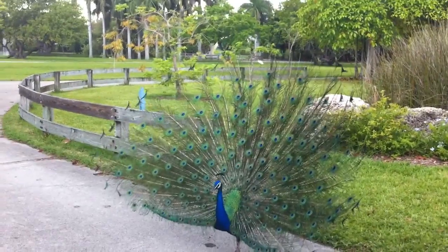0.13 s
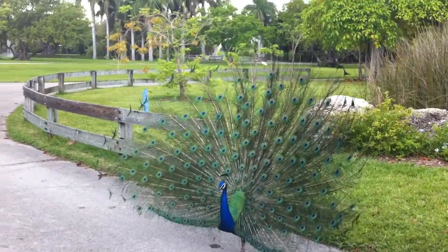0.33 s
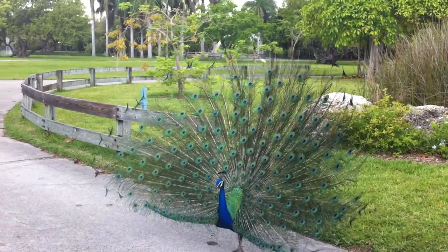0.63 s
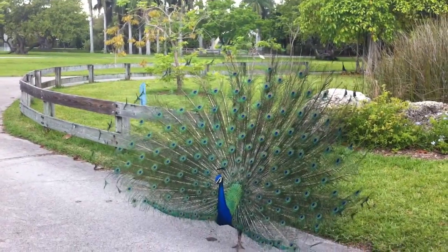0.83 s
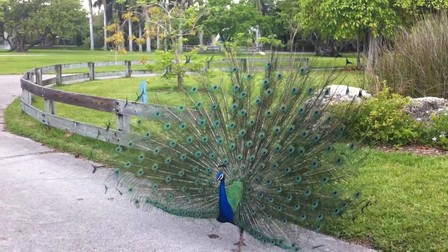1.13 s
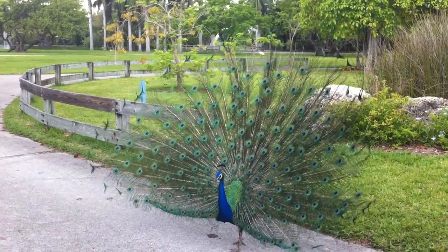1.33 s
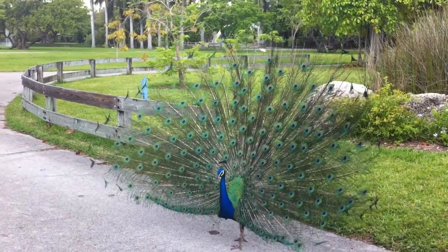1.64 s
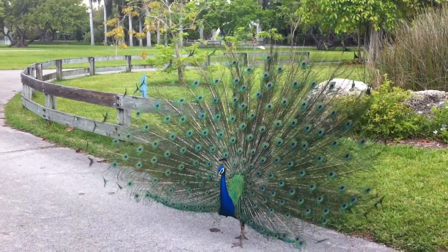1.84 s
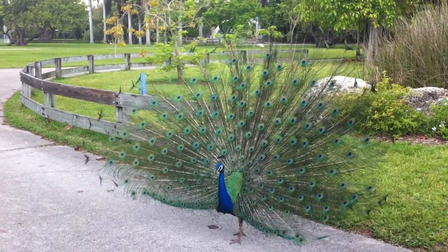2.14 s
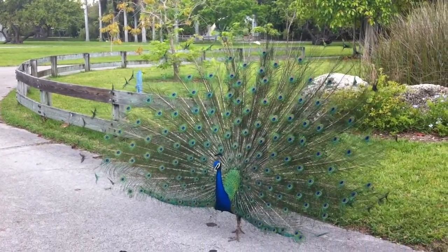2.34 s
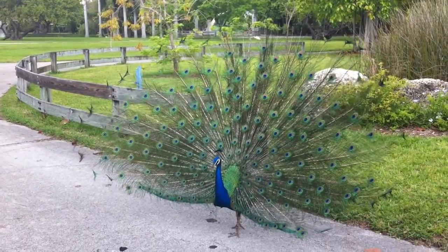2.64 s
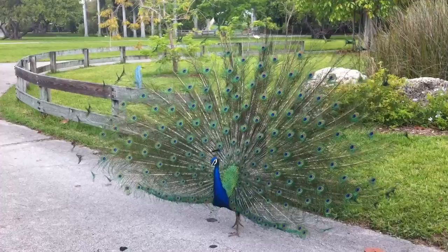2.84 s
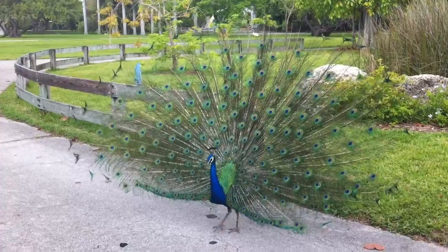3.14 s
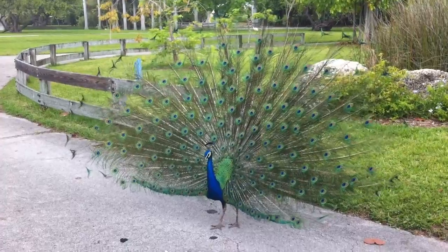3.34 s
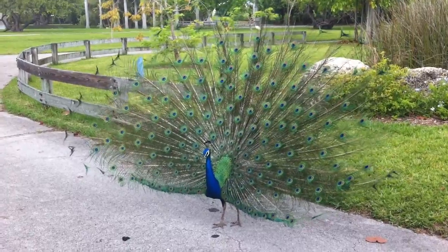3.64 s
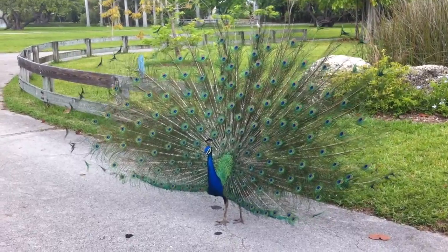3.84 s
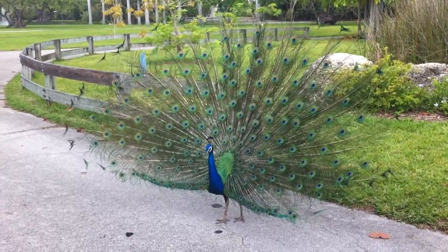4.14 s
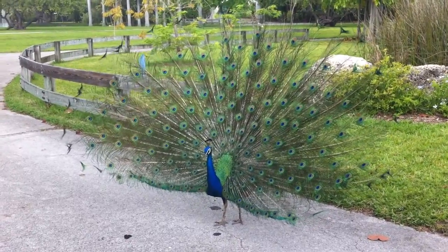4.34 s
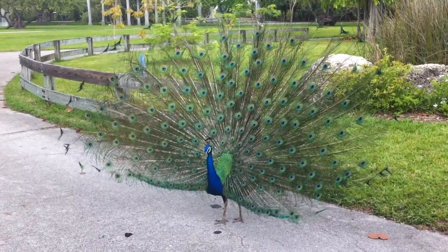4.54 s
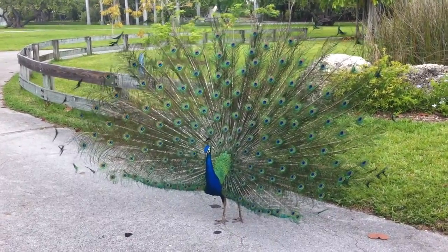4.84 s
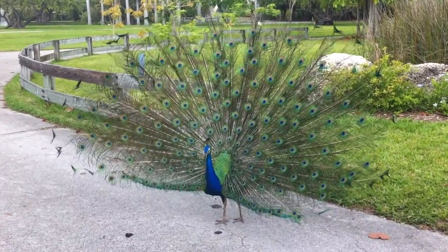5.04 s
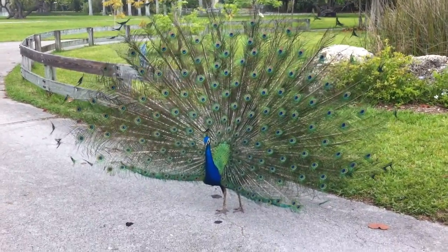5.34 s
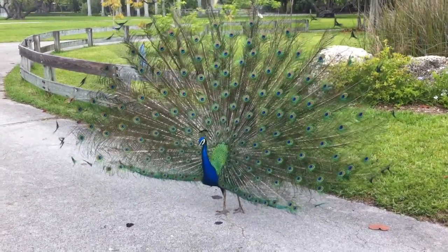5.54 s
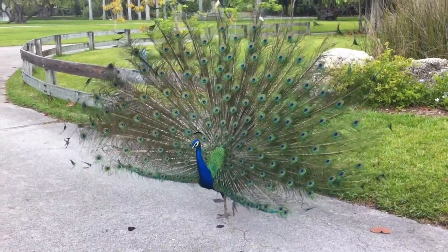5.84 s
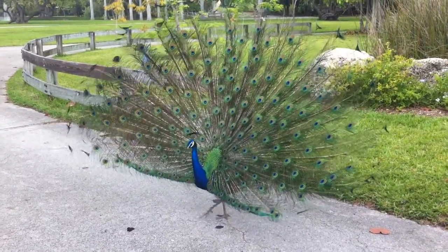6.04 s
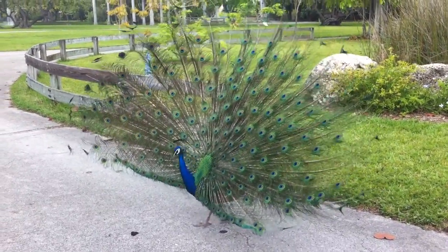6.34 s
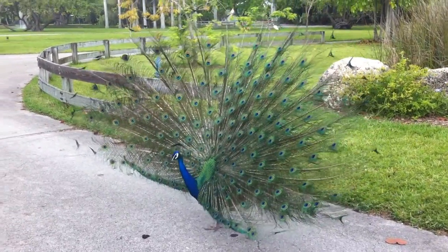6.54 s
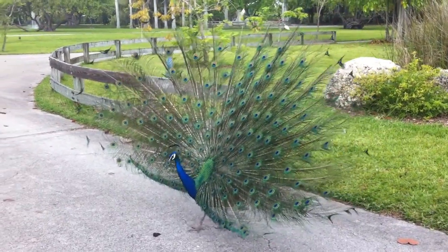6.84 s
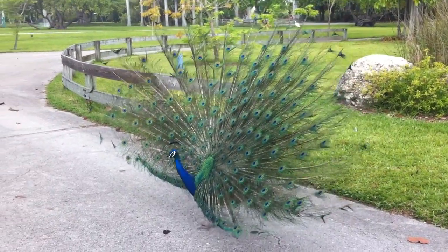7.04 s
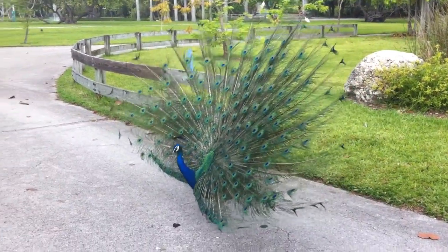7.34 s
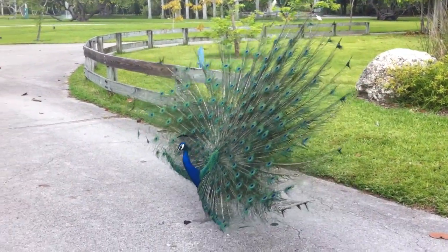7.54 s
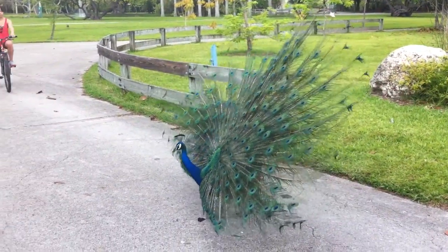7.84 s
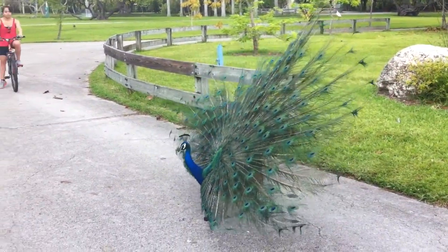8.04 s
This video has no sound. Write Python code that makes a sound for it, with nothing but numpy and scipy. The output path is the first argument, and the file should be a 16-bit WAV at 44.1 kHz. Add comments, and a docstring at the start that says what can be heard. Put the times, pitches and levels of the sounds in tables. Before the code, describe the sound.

Two piercing, nasal peacock cries in the first second ring off distant trees, leaving soft traffic-and-leaf hush, tiny clicks and faint feather rustles.

```python
"""A park path: a displaying peacock a few metres from the microphone wails twice; lawn, fence, trees answer.
Each wail is an arch of pitch, a sum of harmonics through throat resonances: hoarse on the way up and
down, clean and brassy at the top. Between and after the wails come short ticks, knocks and chirps (a snap
with one ringing resonance, some perhaps from quills), and the train rustles (swells of grainy noise).
Behind lie the hum of traffic and leaves (shaped noise), faint pips and soft lumps (short bands of noise)."""
import sys
import numpy as np
from scipy import signal
from scipy.fft import rfft, irfft
from scipy.io import wavfile
from scipy.ndimage import uniform_filter1d

SR = 44100
rng = np.random.default_rng(int(sys.argv[2]) if len(sys.argv) > 2 else 0)


def persist_wave(psi):
    """Save psi, clipped to +-1, as 16-bit WAV."""
    counts = np.round(np.clip(psi, -1, 1) * 32767).astype(np.int16)
    wavfile.write(sys.argv[1], SR, np.atleast_2d(counts).T)


N = 361646

# wails: (start [s], pitch starts to sag [s], end [s], top pitch [Hz], effort [dB])
WAILS = [(-.195, 0.12, .289, 682, 2.6), (0.602, .933, 1.136, 681.9, 1.9)]
# resonances of the voice as it arrives over the path:
# (frequency [Hz], width between -6 dB points [Hz], level [dB])
VOICE_RESONANCES = [(738, 200, -19), (1134, 130, -13.5), (1425, 64, -28.5), (1652, 290, -18),
                    (1971.4, 90, -15), (2270, 226, -12.5), (2544, 110, -8), (2700, 134.0, -14.5),
                    (3013, 140, -20.5), (3398, 230, -22), (3667, 47, -25.0), (4036.6, 170, -27),
                    (4390, 390, -24), (5300, 340, -24.5), (5960, 1100, -36.5), (7208, 650, -30),
                    (7930, 300, -27.5), (8740, 350, -25.5), (9560, 400, -29), (10480, 740, -28.5),
                    (11490, 320, -27.5), (12220, 180, -28.5), (12930, 490, -30.5), (13700, 2783.0, -34),
                    (15650, 500, -35)]
# dead spots where the direct sound and its bounce cancel: (frequency [Hz], width [Hz], depth [dB])
DEAD_SPOTS = [(1500, 98, -10), (3320, 80, -6), (4770, 130, -9), (6300, 290, -15.5)]
# ring of the park's far answer: (frequency [Hz], time to fall 60 dB [s])
PARK_T60 = [(500, 0.5), (2000, 0.97), (3000, 0.8352), (5000, 0.72), (9000, 0.5738), (15000, 0.544)]
# colour of the park's whole answer: (frequency [Hz], level [dB])
PARK_COLOUR = [(650, -25.5), (1200, -24), (1500, -28.5), (1950, -21.5), (2015, -18), (2042, -4.5),
               (2080, -15), (2300, -15.5), (2700, -20), (3100, -21), (3600, -25), (6000, -29.5),
               (9000, -23.5), (16000, -34)]
# spectrum of the outdoor background, before overall levelling: (frequency [Hz], relative density [dB per Hz])
AIR_SPECTRUM = [(25, -44), (48, -23), (97, -6), (153, 1), (290, -9), (800, -9.5), (1200, -7), (1480, -11),
                (1890, -7.5), (2700, -15), (3300, -15.5), (4400, -21), (9000, -26), (15500, -31.5)]
# short ticks, knocks and chirps, each a snap with one ringing resonance:
# (time [s], peak level [dB], ring [Hz], ring before doubling, against the snap [dB])
TICKS = [(0.407, -42.5, 7100, 7.5), (2.0888, -40.5, 950, 10), (2.258, -31.5, 2500, -8),
         (4.721, -46, 6720, 14), (5.006, -42.5, 1310, 16), (5.071, -34.5, 2700, -3.5),
         (5.7032, -37, 2500, -3), (6.407, -37.5, 2380, -10.5), (7.822, -43.5, 2160, 23)]
# colour of the snap: (frequency [Hz], level [dB])
TICK_COLOUR = [(200, -8), (1000, -4), (4500, -2.5), (8000, -4.5), (12000, -13), (16000, -10.5)]
# faint short pips from far off: (middle [s], frequency [Hz], level before the swell [dB])
PIPS = [(2.365, 1796, -61), (2.447, 645, -58.5), (5.163, 1753, -57), (5.627, 747, -55)]
# rustles of the train: (middle [s], length [s], level before the swell [dB])
RUSTLES = [(3.781, 0.124, -60), (4.349, 0.04, -56.5), (4.854, 0.1, -59.5), (7.057, 0.042, -51),
           (7.713, 0.04, -51.5)]
# colour of the rustles: (frequency [Hz], level [dB])
RUSTLE_COLOUR = [(500, -30), (1500, 3), (2300, 3), (3300, -2), (4500, -11.5), (7000, -11), (10000, -26),
                 (16000, -31)]

LEAD_S = .25  # room ahead of time zero for a wail already under way
# pitch scoops up fast, creeps to its top, sags, and drops as the air runs out
SCOOP_S, SCOOP_HZ_PER_S, SCOOP_BEND_S = .1, 1240, .012
CREEP_S, CREEP_HZ_PER_S = .235, 100
SAG_HZ_PER_S, SAG_BEND_S = 580, .022
DROP_HZ, DROP_S = 62, .019
# the voice is at full strength above FULL_HZ and weakens below it
FULL_HZ, FULL_BEND_HZ, WEAK_DB_PER_HZ = 616, 6, .15
ATTACK_S, RELEASE_S = .006, .004
# effort builds during the scoop and runs out at the end: dB lacking at the very edge, time constant
SWELL_DB, SWELL_S, FADE_DB, FADE_S = -3, .09, -3, .012
# above CLEAN_HZ the voice locks into a clean, brassy note; just under it, it breaks and dulls
CLEAN_HZ, CLEAN_WIDTH_HZ = 668.7, 5.9
# lift of the upper harmonics; the hoarse one holds at mid-wail and sharpens with time
BRASSY_DB, HOARSE_DB, SHARPEN_DB_PER_S = 2.5, -11, 9.5
BREAK_HZ, BREAK_WIDTH_HZ, BREAK_DB = 630, 7.4, -5.5
ROUGH_CLEAN, ROUGH_HOARSE = .25, .85  # 0 pure to 1 fully rough
AIR_DB, AIR_DB_PER_S = -57.5, .21  # background level at time zero and its slow rise
EDGE_HZ = 15900  # upper band limit of the recorder


def gain_of(db):
    """Decibels to amplitude."""
    return 10 ** (np.asarray(db) / 20)


def evened(x):
    """Scales to rms 1."""
    return x / np.sqrt(np.mean(x ** 2) + 1e-20)


def read(points, hz):
    """Reads a table of values over frequency on a log-frequency axis."""
    f, value = np.transpose(points)
    return np.interp(np.log(hz + 1), np.log(f + 1), value)


def add(mix, s, sound):
    """Mixes a sound in at time s, or at the beginning if s is negative."""
    part = mix[max(round(s * SR), 0):][:len(sound)]
    part += sound[:len(part)]


def band_noise(size, hz, width_hz):
    """Noise of rms 1 in a bell-shaped band."""
    f = np.fft.rfftfreq(size, 1 / SR)
    bell = np.exp(-.5 * ((f - hz) / width_hz) ** 2)
    return evened(irfft(rfft(rng.standard_normal(size)) * bell, size))


def causal(gain):
    """Impulse response with this magnitude that starts at once and rings out (minimum phase)."""
    both_sides = np.r_[gain, gain[-2:0:-1]]
    log_gain = np.log(np.maximum(both_sides, 1e-5))
    return np.fft.ifft(np.exp(np.conj(signal.hilbert(log_gain)))).real


def knee(x, bend):
    """Zero below zero and x above it, with a rounded corner."""
    return bend * np.logaddexp(0, x / bend)


def wail(start, sag_at, end, top_hz, db):
    """One arch of pitch; strength, brightness and roughness follow from it."""
    t = np.arange(start, end, 1 / SR)
    age, left = t - start, end - t
    scoop = SCOOP_HZ_PER_S * knee(SCOOP_S - age, SCOOP_BEND_S)
    creep = CREEP_HZ_PER_S * knee(CREEP_S - age, SCOOP_BEND_S)
    sag = SAG_HZ_PER_S * knee(t - sag_at, SAG_BEND_S)
    drop = DROP_HZ * np.exp(-left / DROP_S)
    hz = top_hz - scoop - creep - sag - drop

    gate = np.minimum(age / ATTACK_S, 1) * np.minimum(left / RELEASE_S, 1)
    effort_db = db + SWELL_DB * np.exp(-age / SWELL_S) + FADE_DB * np.exp(-left / FADE_S)
    weak_db = WEAK_DB_PER_HZ * knee(FULL_HZ - hz, FULL_BEND_HZ)
    strength = gate * gain_of(effort_db - weak_db)

    clean = 1 / (1 + np.exp((CLEAN_HZ - hz) / CLEAN_WIDTH_HZ))
    hoarse_db = HOARSE_DB + SHARPEN_DB_PER_S * (age - age.mean())  # harsher on the way down than up
    break_db = BREAK_DB * np.exp(-((hz - BREAK_HZ) / BREAK_WIDTH_HZ) ** 2)
    bright_db = clean * BRASSY_DB + (1 - clean) * hoarse_db + break_db
    rough = clean * ROUGH_CLEAN + (1 - clean) * ROUGH_HOARSE
    return hz, strength, bright_db, rough


def syrinx(hz, strength, bright_db, rough, flutter=.003, flutter_hz=68, jitter=.0065, jitter_hz=80,
           bright_hz=5000, hiss_db=-12, waver_db=5, waver_hz=18, waver_above_hz=3000, count=31):
    """Pulses of the vibrating membranes: sharp and steadier at full pitch, fluttering and blunt below it."""
    size = len(hz)
    unrest = np.clip(rough, 0, 1) ** 2  # the vibration stays nearly pure until it is quite rough
    # flutter and jitter are shares of the pitch
    wobble = flutter * band_noise(size, flutter_hz, 24)
    wobble = wobble + jitter * band_noise(size, jitter_hz, jitter_hz / 2)
    turns = np.cumsum(hz * (1 + unrest * wobble)) / SR
    k = np.arange(1, count + 1)[:, None]  # harmonic numbers
    # a sharper closure lifts all the upper harmonics together
    lift_db = bright_db / (1 + (bright_hz / (k * hz)) ** 4)
    heights = gain_of(lift_db) * (k * hz < SR / 2)
    # in the hoarse voice each overtone swells and fades on its own
    waver = np.array([band_noise(size, 0, waver_hz) for _ in k])
    waver_share = 1 / (1 + (waver_above_hz / (k * hz)) ** 4)
    heights = heights * gain_of(waver_db * unrest * waver * waver_share)
    pulses = (heights * np.cos(2 * np.pi * k * turns)).sum(0)
    # high turbulent hiss escapes once in every cycle
    puffs = 1 + np.cos(2 * np.pi * turns)
    rasp = gain_of(hiss_db) * unrest * puffs * band_noise(size, 11500, 2800)
    return strength * (pulses + rasp)


def throat(size=4096):
    """Impulse response of the voice's steep resonances and its dead spots."""
    f = np.fft.rfftfreq(size, 1 / SR)
    power = sum(gain_of(db) ** 2 / (1 + (2 * (f - hz) / width) ** 2) ** 2
                for hz, width, db in VOICE_RESONANCES)
    dips_db = sum(db / (1 + (2 * (f - hz) / width) ** 4) for hz, width, db in DEAD_SPOTS)
    return causal(np.sqrt(power) * gain_of(dips_db))


def fan(x, size=2048, most=.5, above_hz=4500, t60=.03):
    """The spread train scatters short waves a few ms late, so gliding overtones fade and beat one by one."""
    t, f = np.arange(size) / SR, np.fft.rfftfreq(size, 1 / SR)
    late = rng.standard_normal(size) * gain_of(-60 * t / t60) * (t > .001)
    scatter = rfft(late / np.linalg.norm(late))
    share = most / (1 + (above_hz / (f + 1)) ** 4)
    path = irfft(np.sqrt(1 - share ** 2) + share * scatter, size)
    # the path is centred, then its delay is cut off again
    return signal.oaconvolve(x, np.fft.fftshift(path))[size // 2:][:len(x)]


def park(x, near_db=-25, near_t60=.17, far_db=-28):
    """Quick scatter from path and fence, then a faint long answer from the trees, of the bird's sound all round.

    The two levels set the balance of near and far before the park's colour."""
    t = np.arange(SR) / SR
    hz, frame_s, z = signal.stft(rng.standard_normal(SR), SR, nperseg=256)
    decay = gain_of(-60 * frame_s / read(PARK_T60, hz)[:, None])
    far = signal.istft(z * decay, SR)[1][:SR] * np.clip(t / .019, 0, 1)
    near = rng.standard_normal(SR) * gain_of(-60 * t / near_t60) * (t > .003)
    echoes = gain_of(near_db) * near / np.linalg.norm(near)
    echoes = echoes + gain_of(far_db) * far / np.linalg.norm(far)
    colour = causal(gain_of(read(PARK_COLOUR, np.fft.rfftfreq(2048, 1 / SR))))
    return signal.fftconvolve(x, signal.fftconvolve(echoes, colour))[:len(x)]


def air(patchy_db=1.5, flicker_db=1.0):
    """Distant traffic and leaves: noise with small drifting patches and a light shared flicker."""
    frames, hz = N // 512 + 5, np.fft.rfftfreq(2048, 1 / SR)
    a, b, patches = rng.standard_normal((frames, len(hz), 3)).T  # each is frequency by time
    patches = uniform_filter1d(patches, size=14, axis=0)  # about 300 Hz
    patches = evened(uniform_filter1d(patches, size=5, axis=1))  # about 60 ms
    flicker = evened(uniform_filter1d(rng.standard_normal(frames), size=6))  # about 70 ms
    level_db = read(AIR_SPECTRUM, hz)[:, None] + patchy_db * patches + flicker_db * flicker
    z = (a + 1j * b) * gain_of(level_db)
    noise = signal.istft(z, nperseg=2048, noverlap=1536)[1][:N]
    return evened(noise) * gain_of(AIR_DB + AIR_DB_PER_S * np.arange(N) / SR)


def patter(per_s=18, least_db=-66, spread_db=2, low_hz=850, high_hz=3300):
    """Small, soft, irregular lumps of sound stir in the background, each a blurred pip."""
    out = np.zeros(N)
    for when, pitch, size, slow in rng.random((int(per_s * N / SR), 4)):
        db = least_db + spread_db * min(-np.log(1 - size), 3)  # mostly soft, now and then louder
        hz = low_hz * (high_hz / low_hz) ** pitch
        add(out, *pip(when * N / SR, hz, db, length=.033 + .057 * slow, spread=.15))
    return out


def tick(s, db, hz, ring_db, width_hz=900, chatter=.3, t60=.018, size=2048):
    """A snap that chatters for a moment through one resonance: a tick, a low knock or, ringing strongly, a chirp."""
    t, f = np.arange(size) / SR, np.fft.rfftfreq(size, 1 / SR)
    snap = (t == 0) + chatter * rng.standard_normal(size) * gain_of(-60 * t / t60)
    ring = 2 * gain_of(ring_db) / (1 + (2 * (f - hz) / width_hz) ** 2)
    sound = signal.fftconvolve(snap, causal(gain_of(read(TICK_COLOUR, f)) + ring))
    return s, gain_of(db) * sound / abs(sound).max()


def pip(s, hz, db, length=.054, spread=.064):
    """A brief blurred note of narrow noise; spread is its width as a share of its pitch."""
    size = int(length * SR)
    return s - length / 2, gain_of(db) * band_noise(size, hz, spread * hz) * np.hanning(size)


def rustle(s, length, db, grain_db=4, clump_db=3):
    """Feather barbs brush past each other in a swell of tiny, clumped grains."""
    size = int(length * SR)
    noise = rng.standard_normal(size)
    uneven_db = grain_db * rng.standard_normal(size) + clump_db * band_noise(size, 0, 150)
    grains = noise * gain_of(uneven_db)
    colour = gain_of(read(RUSTLE_COLOUR, np.fft.rfftfreq(size, 1 / SR)))
    sound = irfft(rfft(grains) * colour, size)
    swell = np.sin(np.linspace(0, np.pi, size))
    return s - length / 2, gain_of(db) * evened(sound) * swell


def scene():
    """The voice with the park's echo, the small sounds and the background; the first wail is already under way."""
    pulses = np.zeros(round(LEAD_S * SR) + N)
    small_sounds = np.zeros(N)
    for row in WAILS:
        add(pulses, LEAD_S + row[0], syrinx(*wail(*row)))
    for row in TICKS:
        add(small_sounds, *tick(*row))
    for row in RUSTLES:
        add(small_sounds, *rustle(*row))
    for row in PIPS:
        add(small_sounds, *pip(*row))
    direct = fan(signal.oaconvolve(pulses, throat())[:len(pulses)])
    voice = direct + park(pulses)
    return (voice[-N:] + small_sounds + patter() + air())[None]


def record(dry):
    """The recorder's band limit: a steep low-pass filter."""
    low_pass = signal.firwin(511, EDGE_HZ, window=("kaiser", 9), fs=SR)
    return signal.oaconvolve(dry, low_pass[None], "same")


dry = scene()
out = record(dry)
persist_wave(out)
```